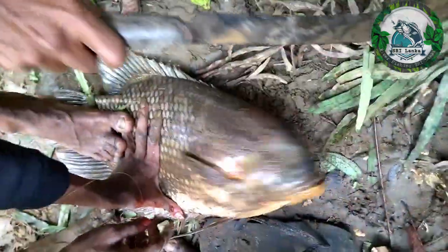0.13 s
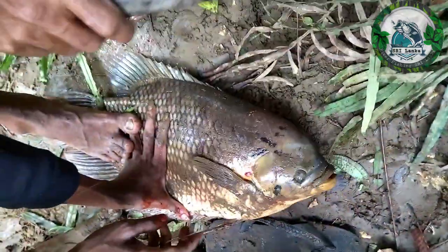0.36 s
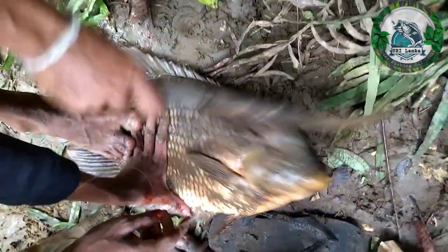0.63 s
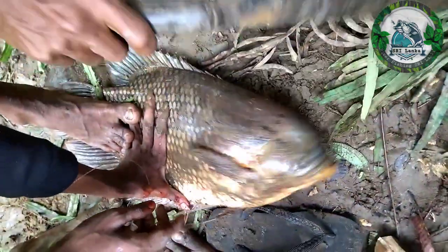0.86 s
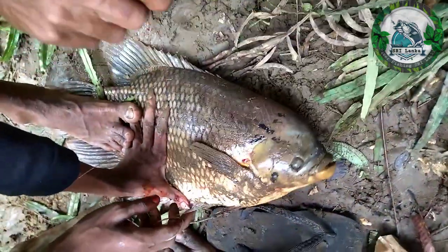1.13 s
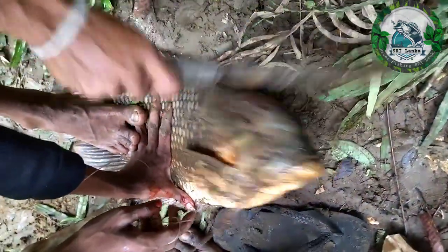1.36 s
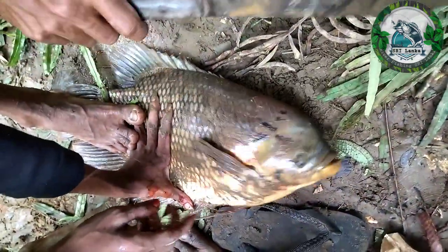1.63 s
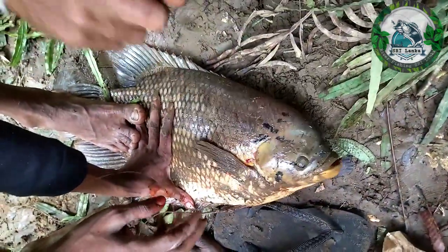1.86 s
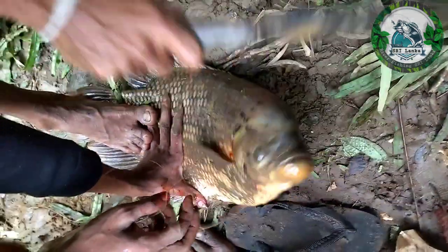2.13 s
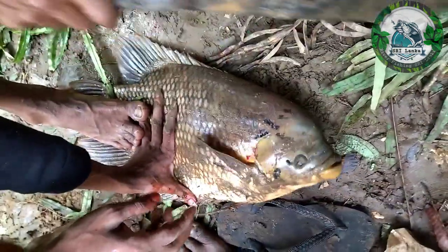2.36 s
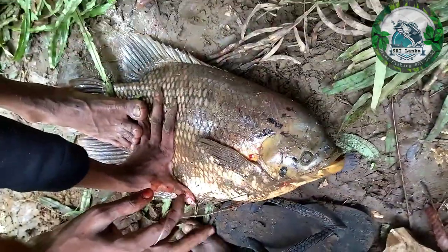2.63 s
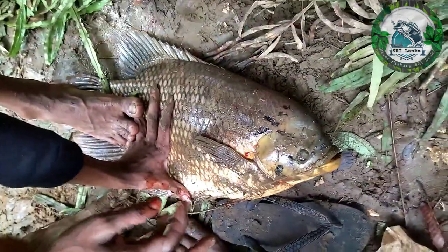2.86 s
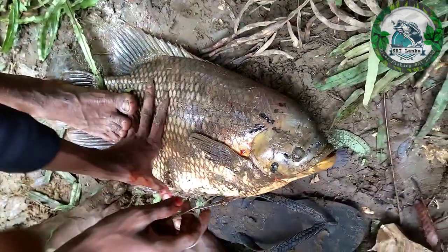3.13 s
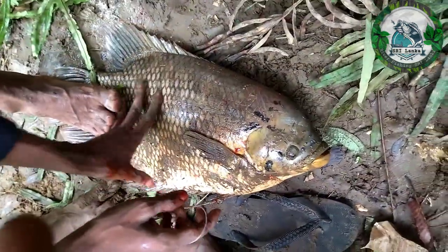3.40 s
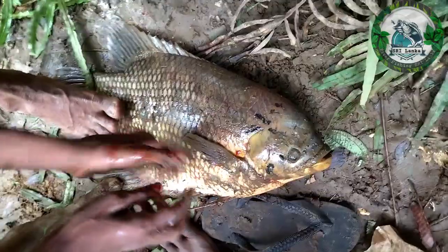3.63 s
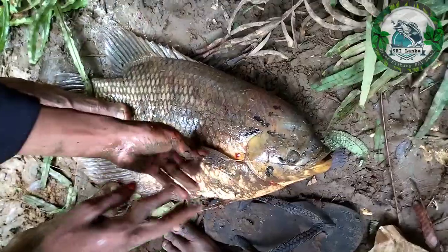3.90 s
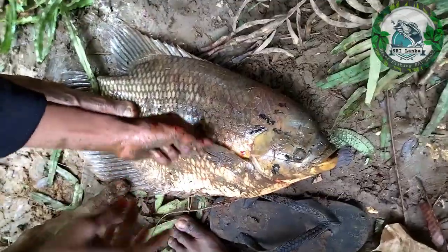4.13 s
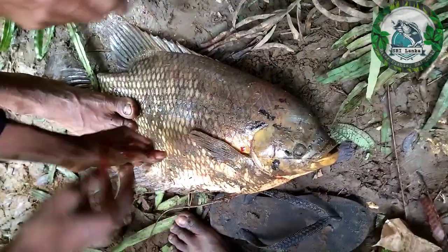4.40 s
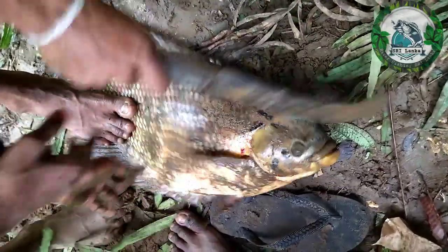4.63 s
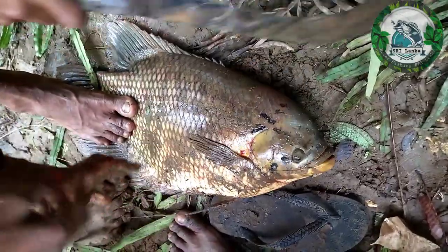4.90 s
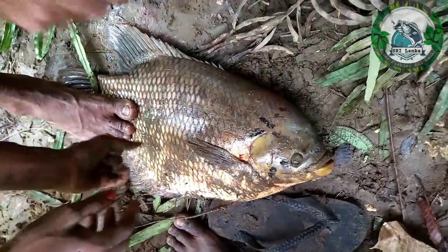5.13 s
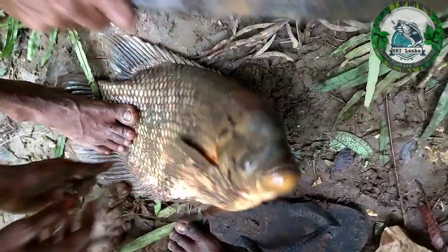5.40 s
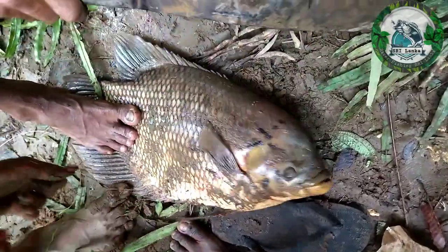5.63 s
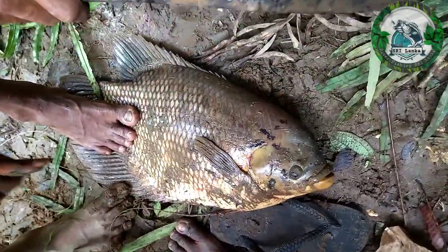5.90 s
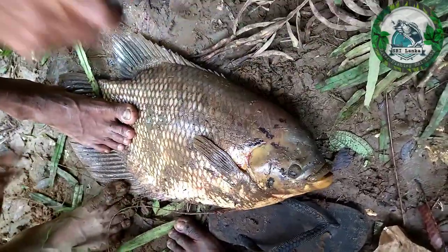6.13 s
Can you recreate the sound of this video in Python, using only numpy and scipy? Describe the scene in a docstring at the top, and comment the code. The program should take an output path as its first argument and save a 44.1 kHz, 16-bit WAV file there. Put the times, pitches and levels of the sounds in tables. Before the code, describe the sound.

Faint even river rush in the distance. Near the microphone, three sharp knocks of heavy blade on wet fish and damp soil, each followed by a small slap. One short warbling bird whistle answers with a slight echo. After two quiet seconds of dry leaf crackles and soft pats, two brighter blows follow. Dry open air, stereo handheld microphone.

```python
"""A river rushes evenly throughout: bands of noise. Leaves, droplets and soft pats tick: noise puffs.
First the dying tail of a blow struck just before the start, three puffs. Then the back of a long knife
strikes a wet fish on damp ground three times: a dull thud of ringing flesh, a wet crack of grainy noise
and the ring of the blade; the fish slaps back on the soil just after. A bird whistles once, a warbling
near-sine with an echo; two more blows follow, and the river eases a little at the end."""
import sys
import numpy as np
from scipy import signal
from scipy.fft import rfft, irfft, next_fast_len
from scipy.io import wavfile

SR = 44100
rng = np.random.default_rng(int(sys.argv[2]) if len(sys.argv) > 2 else 0)


def nominal_scale(level):
    """Amplitude ratio for a level in decibels (scalar or array-like)."""
    x = np.asarray(level, float) / 20
    return 10 ** x


def wav_record(signal):
    """Record a signal, one row per channel, as 16-bit PCM in the file named by sys.argv[1]."""
    frames = np.transpose(np.atleast_2d(signal))
    bounded = np.clip(frames, -1, 1)
    # unit amplitude maps onto the largest positive 16-bit level
    quanta = np.round(bounded * 32767).astype(np.int16)
    wavfile.write(sys.argv[1], SR, quanta)


N = 276188


def rms_one(x):
    """Scale to an rms of 1."""
    return x / np.sqrt(np.mean(x ** 2) + 1e-20)


def at_hz(points, hz, order=1):
    """Read one column of a table on a log-frequency axis."""
    points = np.array(points)
    return np.interp(np.log(hz), np.log(points[:, 0]), points[:, order])


def clicks(times_s, sizes):
    """A train of single impulses."""
    out = np.full(N, 1e-18)
    at = np.round(np.asarray(times_s) * SR).astype(int)
    np.add.at(out, np.clip(at, 0, N - 1), sizes)
    return out


def ring(x, hz, t60_s):
    """Damped resonance: a unit click starts a decaying sine of height 1."""
    r, w = nominal_scale(-60 / (t60_s * SR)), 2 * np.pi * hz / SR
    return signal.lfilter([0, np.sin(w)], [1, -2 * r * np.cos(w), r * r], x)


def drift(rate_hz):
    """Slow chance of spread 1: noise through two equal poles, drawn every 40 samples."""
    r = np.exp(-80 * np.pi * rate_hz / SR)
    noise = rng.standard_normal(N // 40 + 2002)
    slow = signal.lfilter([1], [1, -2 * r, r * r], noise)[2000:]
    return np.interp(np.arange(N) / 40, np.arange(len(slow)), rms_one(slow))


def band(x, low_hz, high_hz):
    """Butterworth band-pass."""
    sos = signal.butter(2, [low_hz, min(high_hz, .45 * SR)], "band", fs=SR, output="sos")
    return signal.sosfilt(sos, x)


def spread(mid, side, alike, lean_db):
    """Two channels of given likeness and left-over-right level from two unrelated signals."""
    alike = np.clip(alike, -1, 1)
    sides = np.sqrt((1 - alike) / 2) * side * np.array([[1], [-1]])
    pair = np.sqrt((1 + alike) / 2) * mid + sides
    return pair * nominal_scale(np.array([[.5], [-.5]]) * lean_db)


EDGES_HZ = 40 * 2 ** np.arange(0, 8.8, 1 / 5)   # noise bands, five per octave
# spectrum of the rush, relative: freq_hz, level_db_per_hz
RIVER_SPECTRUM = [(25, -20), (45, -17), (85, 5), (150, 5), (330, 3), (450, -0.5), (1100, 0), (1700, -1),
                  (2500, 2), (4500, -5), (7200, -11), (9000, -6.5), (11200, -14), (13000, -7.5),
                  (15400, -12)]
# left-right likeness of the river: freq_hz, likeness
RIVER_LIKENESS = [(60, 0.92), (150, 0.95), (400, 0.82), (900, 1), (1800, 0.023), (3500, 0.14), (8000, 0.0)]
# microphone ports, left over right, river and puffs: freq_hz, lean_db
PORT_LEAN = [(60, 6), (99, -3), (160, -1), (270, -1.5), (450, -1), (740, 0), (1220, -4), (2010, -5),
             (3330, -1), (5500, 0.5), (9080, 8), (15000, -4)]
RIVER_DB, RIVER_SAG_S, RIVER_SAG_DB_PER_S = -50, 6.06, 7


def river():
    """Rushing water: narrow noise bands, each with its own level, flicker, likeness and balance."""
    out, together = 0, drift(0.96)
    white = rng.standard_normal((2, 2, N))      # neighbouring bands get unrelated noise
    for k, (low, high) in enumerate(zip(EDGES_HZ, EDGES_HZ[1:])):
        hz = np.sqrt(low * high)
        gain = nominal_scale(at_hz(RIVER_SPECTRUM, hz) + 0.78 * together + 1.05 * drift(30))
        mid, side = band(white[k % 2], low, high)
        out = out + gain * spread(mid, side, at_hz(RIVER_LIKENESS, hz), at_hz(PORT_LEAN, hz))
    sag_db = RIVER_SAG_DB_PER_S * np.maximum(np.arange(N) / SR - RIVER_SAG_S, 0)
    return rms_one(out) * nominal_scale(RIVER_DB - sag_db)


BIRD_START_S, BIRD_PEAK_S, BIRD_DB, SWELL_DB_PER_S, FADE_DB_PER_S = 2.335, 2.435, -41.5, 115, 135
BIRD_HIGH_HZ, BIRD_LOW_HZ, SAG_MID_S, SAG_S = 1415, 1294, 2.41, 0.025
WARBLE_PER_S, WARBLE_CREST_S, WARBLE_DB, WARBLE_HZ, WARBLE_END_S = 28.5, 2.6, 10.5, 136.4, 2.5


def bird():
    """A sagging near-sine; each warble dips the level and lifts the pitch; short echo off the bank."""
    t = np.arange(N) / SR
    warble = (1 - np.cos(2 * np.pi * WARBLE_PER_S * (t - WARBLE_CREST_S))) / 2
    dip = warble * np.clip((WARBLE_END_S - t) / 0.048, 0, 1)
    sag = (1 - np.tanh((t - SAG_MID_S) / SAG_S)) / 2
    hz = BIRD_LOW_HZ + (BIRD_HIGH_HZ - BIRD_LOW_HZ) * sag + WARBLE_HZ * dip
    phase = 2 * np.pi * np.cumsum(hz * (1 + 0.0062 * drift(42.0))) / SR
    swell_db = np.minimum(SWELL_DB_PER_S * (t - BIRD_PEAK_S), FADE_DB_PER_S * (BIRD_PEAK_S - t))
    level_db = BIRD_DB + swell_db - WARBLE_DB * dip
    level = nominal_scale(level_db + 2.0 * drift(45)) * np.clip((t - BIRD_START_S) / 0.0087, 0, 1)
    call = np.sqrt(2) * level * (np.sin(phase) + nominal_scale(-18) * np.sin(2 * phase))     # faint octave
    echo = nominal_scale(-9) * np.roll(call, round(0.013 * SR))
    return (call + echo * [[1], [-1]]) * nominal_scale(np.array([[-1.5], [1.5]]))


# left-right likeness of near sounds: freq_hz, likeness
NEAR_LIKENESS = [(500, 1), (1500, 0.66), (4000, 0.79), (12000, 0.17)]


def puffs(rows, octaves, rise_s, t60_s):
    """Short bursts of noise of one width and length, each with its own pitch."""
    out, t = np.zeros((2, N)), np.arange(round(.08 * SR)) / SR
    shape = (1 - np.exp(-t / rise_s)) * nominal_scale(-60 * t / t60_s)
    width = 2 ** (octaves / 2)
    for start_s, peak_db, hz in rows:
        puff = band(shape * rng.standard_normal((2, len(t))), hz / width, hz * width)
        puff = puff / np.abs(puff).max(axis=1, keepdims=True) * nominal_scale(peak_db)
        at = round(start_s * SR)
        pair = spread(*puff, at_hz(NEAR_LIKENESS, hz), at_hz(PORT_LEAN, hz))
        out[:, at:at + len(t)] += pair[:, :N - at]
    return out


# treble puffs, dry leaves crackling; the row before 0.003 s is the dying tail of a blow
# struck just before the start: start_s, peak_db
TREBLE_PUFFS = [(0.0014, -32), (0.043, -34), (0.1156, -43), (0.8793, -38.5), (0.9744, -43), (1.0198, -39.5),
                (1.482, -39.5), (1.6794, -47), (2.365, -41), (2.839, -39), (3.4635, -40.5), (3.509, -38.5),
                (4.8586, -33), (5.489, -36)]
LEAF_HZ, FAINT_LEAVES_PER_S, FAINT_LEAF_DB = 9350, 1.8, -48


def leaves_and_tail():
    """Wide treble puffs: tail of an earlier blow, then leaves, plus fainter ones at random moments."""
    chance = rng.random((round(FAINT_LEAVES_PER_S * N / SR), 2))
    faint = [(when * (N - 1) / SR, FAINT_LEAF_DB + 6 * size) for when, size in chance]
    rows = [(start_s, peak_db, LEAF_HZ) for start_s, peak_db in TREBLE_PUFFS + faint]
    return puffs(rows, octaves=2.3, rise_s=0.0015, t60_s=0.044)


# clicks of droplets and scales: start_s, peak_db, pitch_hz
DROP_CLICKS = [(0.696, -31, 4270), (0.7065, -28, 2790), (1.166, -40.5, 1500), (1.402, -23, 2820),
               (3.508, -38, 3630), (3.5115, -33, 3600), (3.513, -36, 2050), (4.38, -41, 3000),
               (4.395, -41, 2860), (4.7395, -38, 8300)]


def droplets():
    """Droplets and scales click: narrow, brief puffs."""
    return puffs(DROP_CLICKS, octaves=0.42, rise_s=0.0018, t60_s=0.019)


# lower puffs, fish slapping back on the soil and soft pats nearby; the rows before 0.003 s are
# the dying tail of a blow struck just before the start: start_s, peak_db, pitch_hz
LOWER_PUFFS = [(0.001, -32.5, 800), (0.002, -41, 135), (0.695, -36, 295), (0.706, -37, 807),
               (0.961, -44, 283), (1.405, -35, 293), (1.413, -34.5, 854), (1.44, -45, 293), (2.1, -27, 605),
               (2.103, -36, 1500), (2.361, -45, 665), (3.794, -43.5, 272), (4.707, -29.5, 240),
               (4.721, -37.5, 353), (4.815, -45.5, 600), (5.345, -32, 207), (5.35, -29, 650),
               (5.599, -35, 920), (5.611, -52, 299)]


def slaps_and_tail():
    """Soft-edged puffs: tail of an earlier blow, then fish on soil and soft pats."""
    return puffs(LOWER_PUFFS, octaves=1.26, rise_s=0.0033, t60_s=0.023)


# knife blows, relative levels: start_s, sizzle_db, thud_db, upper_thud_db, knock_db, crack_db,
# thud_lean_db (left over right), upper_thud_pitch_factor
BLOWS = [(0.6797, -20.5, -8, -12.5, -25, -22.5, -1, 0.97), (1.3832, -16.5, -8, -12, -20, -22.5, -0.5, 1.11),
         (2.0767, -15.5, -12.5, -6.5, -19.5, -21, -4, 0.99),
         (4.6876, -12.5, -11, -11, -22.5, -17.5, -5, 0.94), (5.3218, -13, -9, -12, -22.5, -20.5, -1, 1.16)]
# centres of knock, crack and sizzle: freq_hz
KNOCK_CRACK_SIZZLE_HZ = [900, 4200, 8500]


def strength_db(hz):
    """Level of every blow at one frequency, read between its knock, crack and sizzle."""
    _, sizzle_db, _, _, knock_db, crack_db, _, _ = np.transpose(BLOWS)
    levels_db = np.transpose([knock_db, crack_db, sizzle_db])
    return np.array([np.interp(np.log(hz), np.log(KNOCK_CRACK_SIZZLE_HZ), row) for row in levels_db])


# damped blade and skull plates, relative levels: freq_hz, level_db, t60_s
BLADE_MODES = [(650, -11, 0.065), (800, -14.5, 0.094), (1250, -11.5, 0.024), (1228, -3, 0.035),
               (1660, 0, 0.034), (2360, -11, 0.0072), (2640, -8, 0.011), (4190, 0.5, 0.0093),
               (4416, -8, 0.015), (5580, -14, 0.029), (8470, -10, 0.014), (9500, -18.5, 0.026),
               (12300, -12, 0.022)]
# near sound of blade and crack, left over right: freq_hz, lean_db
NEAR_LEAN = [(500, -0.5), (800, -9), (1400, -7.5), (2200, -0.5), (3000, 3), (4500, 11), (6000, 4),
             (8500, 15), (13000, 3)]


def blade():
    """The edge lands, then the blade's length: two contacts ring each mode, reweighted every blow."""
    start_s = np.transpose(BLOWS)[0]
    out = np.zeros((2, N))
    for hz, level_db, t60_s in BLADE_MODES:
        size = nominal_scale(strength_db(hz) + level_db + rng.normal(0, 2.5, len(start_s)))
        edge = clicks(start_s + .0005, -size)
        length = clicks(start_s + rng.uniform(.001, .004, len(start_s)), 0.22 * size)
        out += spread(ring(edge + length, hz, t60_s), 0, 1, at_hz(NEAR_LEAN, hz))
    return out


# wet crack, relative levels: freq_hz, level_db_per_hz, t60_s, spatter_db (against the burst)
CRACK_BANDS = [(574, 19, 0.01, -45), (800, 9.5, 0.02, -44.5), (1180, 9, 0.0075, -30), (1750, 5, 0.033, -35),
               (2720, 5.5, 0.016, -26), (3300, -10.5, 0.019, -15), (4600, 1, 0.022, -31),
               (6770, -9.5, 0.012, -25), (8800, -7.5, 0.012, -29), (10800, -16.5, 0.033, -20.5),
               (15200, -15, 0.025, -15)]
SPATTER_S, SPATTER_LUMP_S, SPATTER_LUMP_DB = 0.04, 0.00307, 4
CRACK_DB = -3   # against the blade


def cracks():
    """Scales and water burst: grainy noise dies band by band, a weaker lumpy spatter thins out."""
    start_s, t = np.transpose(BLOWS)[0], np.arange(round(.2 * SR)) / SR
    count = len(start_s)
    out = np.zeros((count, 2, len(t)))
    rows = rng.standard_normal((count, 80))
    lump = np.array([np.interp(t, np.arange(len(row)) * SPATTER_LUMP_S, row) for row in rows])
    thinning = np.exp(-(t / SPATTER_S) ** 1.47) * nominal_scale(SPATTER_LUMP_DB * lump)
    for low, high in zip(EDGES_HZ, EDGES_HZ[1:]):
        hz = np.sqrt(low * high)
        if hz <= CRACK_BANDS[0][0]:
            continue
        grain_db = 3.53 * np.minimum(rng.exponential(1, len(t)), 4)
        grain = rng.standard_normal((2, count, len(t))) * nominal_scale(grain_db)
        decay = nominal_scale(-60 * t / at_hz(CRACK_BANDS, hz, order=2))
        shape = decay + nominal_scale(at_hz(CRACK_BANDS, hz, order=3)) * thinning
        shape = shape * (1 - np.exp(-t / 0.00015))    # the contact spreads along the blade
        burst = band(shape * grain, low, high)
        energy = np.sum(burst ** 2, axis=2, keepdims=True)
        burst = burst / np.sqrt(energy / np.sum(shape ** 2, axis=1, keepdims=True))
        level_db = strength_db(hz) + at_hz(CRACK_BANDS, hz) + CRACK_DB
        size = nominal_scale(level_db) * np.sqrt((high - low) / 1000)
        pair = spread(*burst[:, :, None], at_hz(NEAR_LIKENESS, hz), at_hz(NEAR_LEAN, hz))
        out += size[:, None, None] * pair
    whole = np.zeros((2, N))
    for at, burst in zip(np.round(start_s * SR).astype(int), out):
        whole[:, at:at + len(t)] += burst
    return whole


# low body modes of the fish on the soil, relative: freq_hz, level_db, t60_s
BELLY_MODES = [(92, -8, 0.18), (180, 3, 0.039), (243, -3, 0.039)]
# upper body modes, freq_hz before the pitch factor of the blow: freq_hz, level_db, t60_s
SKULL_MODES = [(344.5, 3.5, 0.023), (409, -12.5, 0.056)]
CONTACT_S, RADIATES_ABOVE_HZ = 0.00068, 279


def thuds():
    """A soft push, first a rarefaction, rings belly and skull; a small body radiates little bass."""
    push = -np.hanning(round(2 * CONTACT_S * SR))
    push = push / np.abs(push).sum()
    out = np.zeros((2, N))
    for start_s, _, thud_db, upper_db, _, _, lean_db, factor in BLOWS:
        blow = signal.lfilter(push, [1], clicks([start_s], 0.88))
        belly = sum(nominal_scale(thud_db + db) * ring(blow, hz, t60_s) for hz, db, t60_s in BELLY_MODES)
        skull = sum(nominal_scale(upper_db + db) * ring(blow, hz * factor, t60_s) for hz, db, t60_s in SKULL_MODES)
        out += spread(belly + skull, 0, 0.86, lean_db)     # no side signal: 0.86 only sets gain
    radiation = signal.butter(2, RADIATES_ABOVE_HZ, "high", fs=SR, output="sos")
    return signal.sosfilt(radiation, out)


# phase between the ports for near sound: freq_hz, right_lag_rad
PORT_TURN = [(400, 0), (1000, -0.97), (1800, 1.5), (2400, 2), (2900, 7), (4000, 6.5), (4700, 9.5),
             (9000, 15.5)]


def housing(pair):
    """The housing turns the phase of the right port against the left."""
    size = next_fast_len(N + SR // 10)
    hz = np.arange(1, size // 2 + 2) * SR / size
    turned = rfft(pair[1], size) * np.exp(-1j * at_hz(PORT_TURN, hz))
    return np.array([pair[0], irfft(turned, size)[:N]])


def scene():
    """Bird and river far off, blows and small sounds close by."""
    small = slaps_and_tail() + droplets() + leaves_and_tail()
    return river() + bird() + housing(blade() + cracks() + small) + thuds()


def top_cut(x):
    """Nothing passes above the cut-off."""
    return signal.sosfilt(signal.butter(12, 16640, fs=SR, output="sos"), x)


RIGHT_LAG_SAMPLES, MIC_CUT_HZ, TOP_HZ = 8, 43, 16000


def record(dry):
    """Right port hears later; capsule loses deep bass; a steep low-pass cuts the top; peaks round."""
    ports = np.array([dry[0], np.roll(dry[1], RIGHT_LAG_SAMPLES)])
    bass_cut = signal.butter(2, MIC_CUT_HZ, "high", fs=SR, output="sos")
    capsule = signal.sosfilt(bass_cut, ports)
    low_pass = signal.cheby2(10, 40, TOP_HZ, fs=SR, output="sos")     # 40 dB down from TOP_HZ
    topless = signal.sosfilt(low_pass, capsule)
    mix = 0.99 * np.tanh(topless / 0.91)
    return top_cut(mix)


dry = scene()
out = record(dry)
wav_record(out)
```